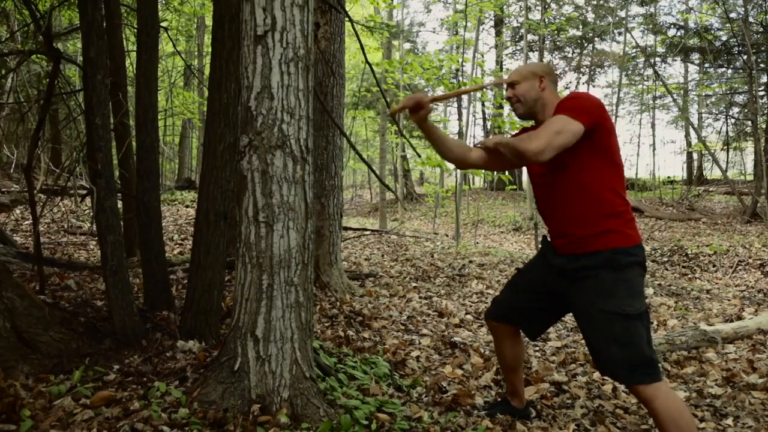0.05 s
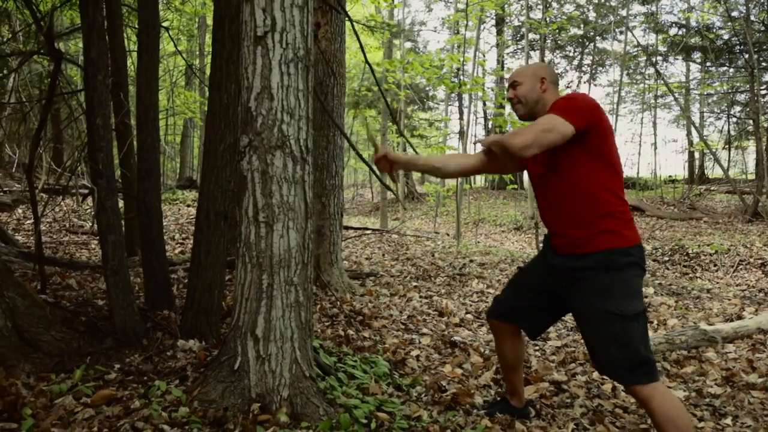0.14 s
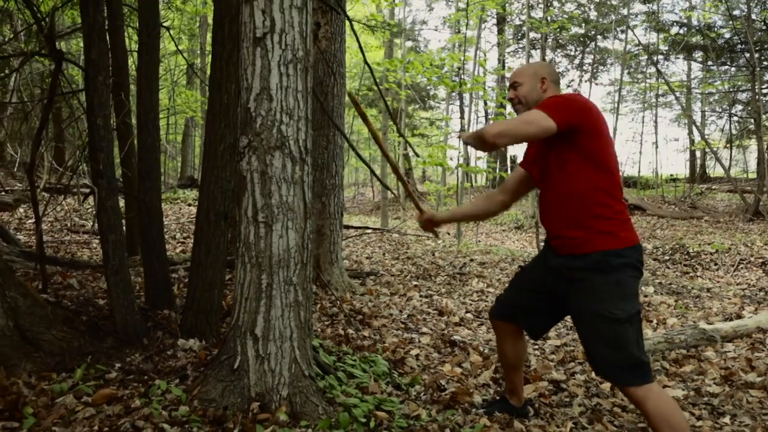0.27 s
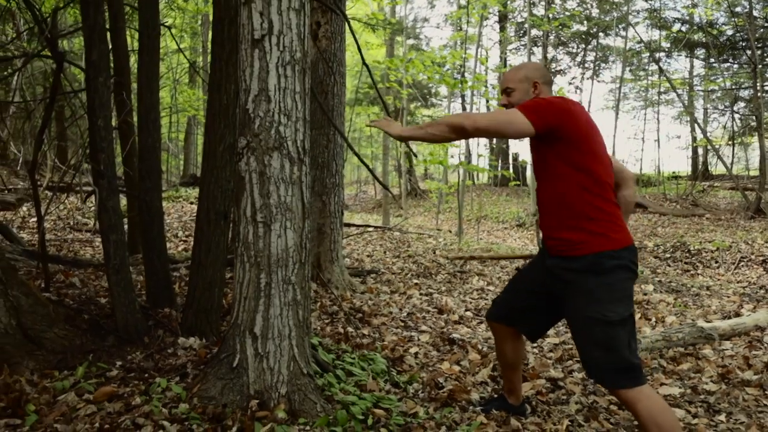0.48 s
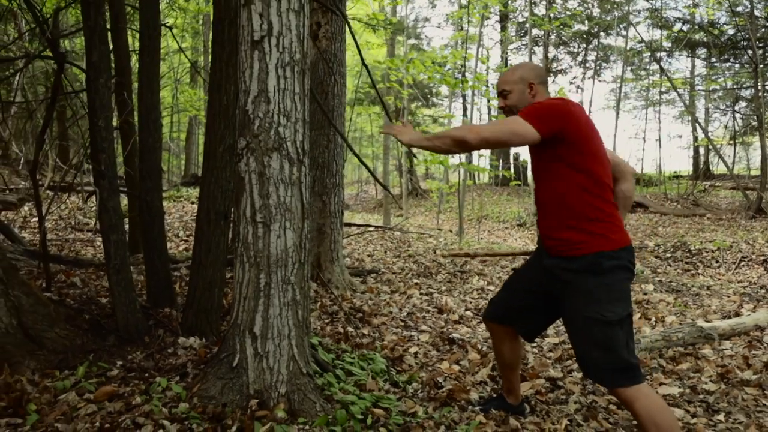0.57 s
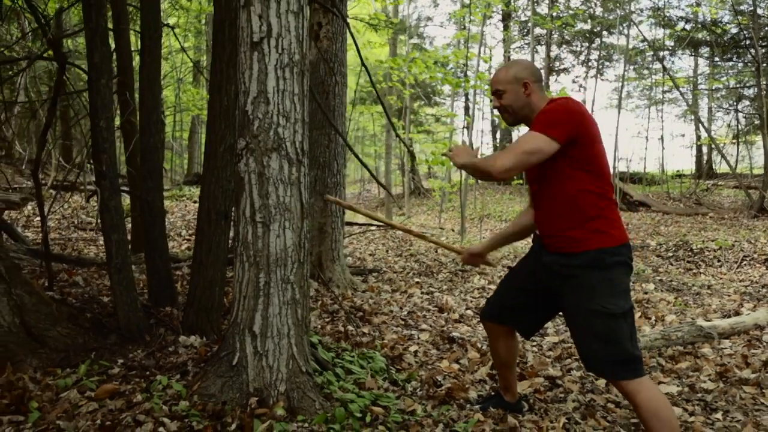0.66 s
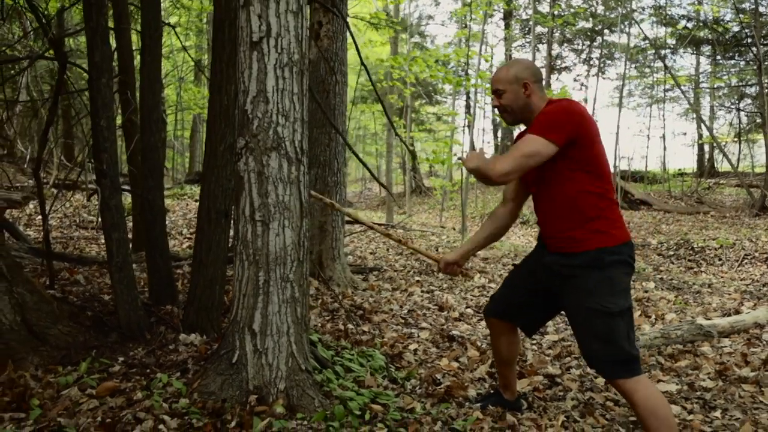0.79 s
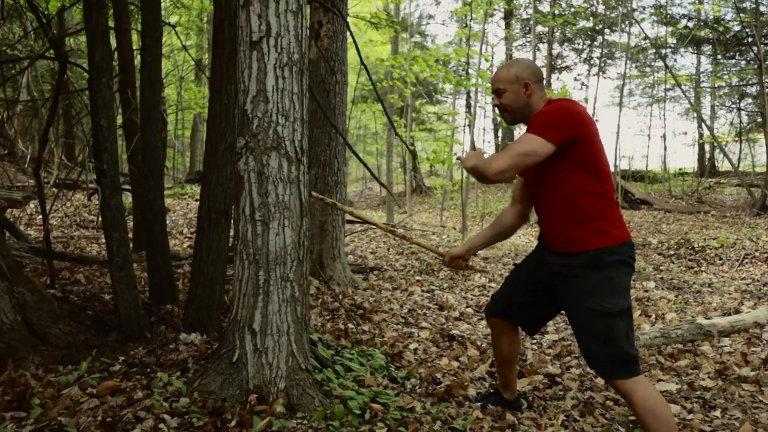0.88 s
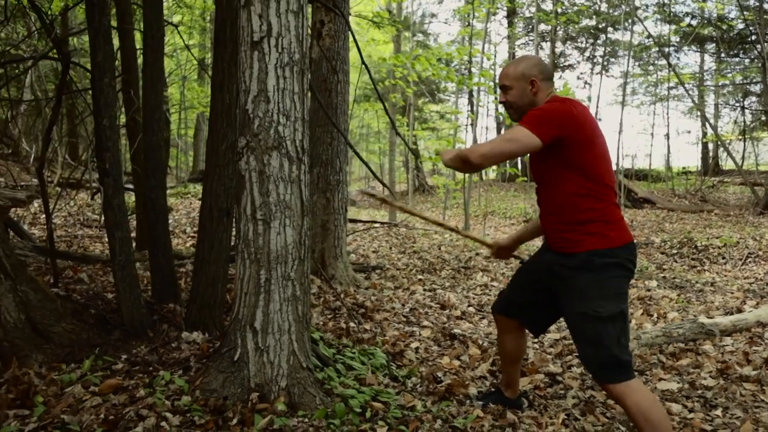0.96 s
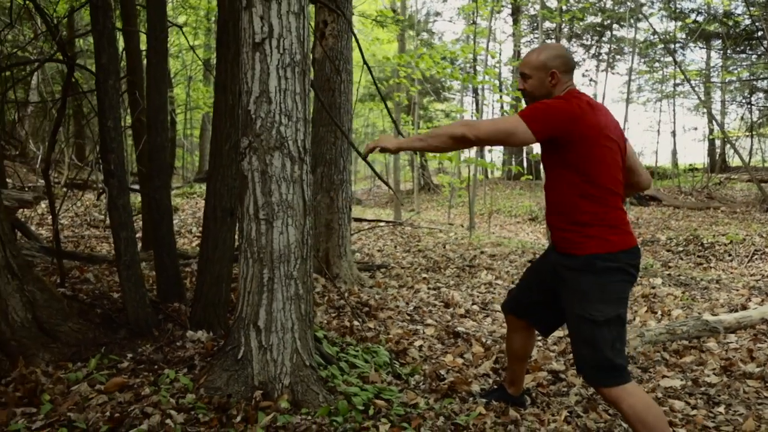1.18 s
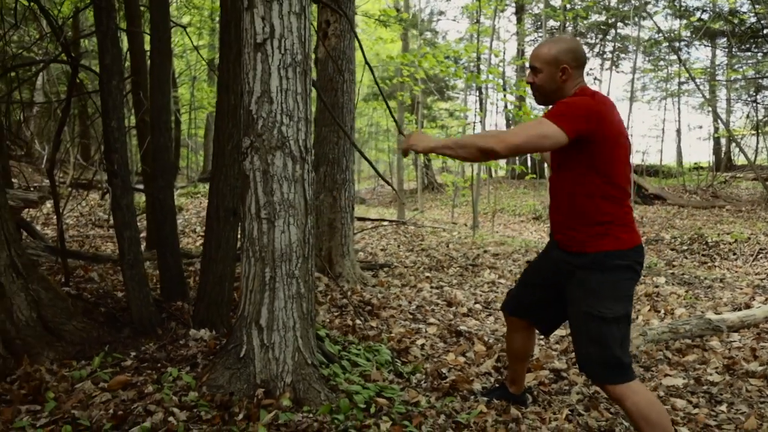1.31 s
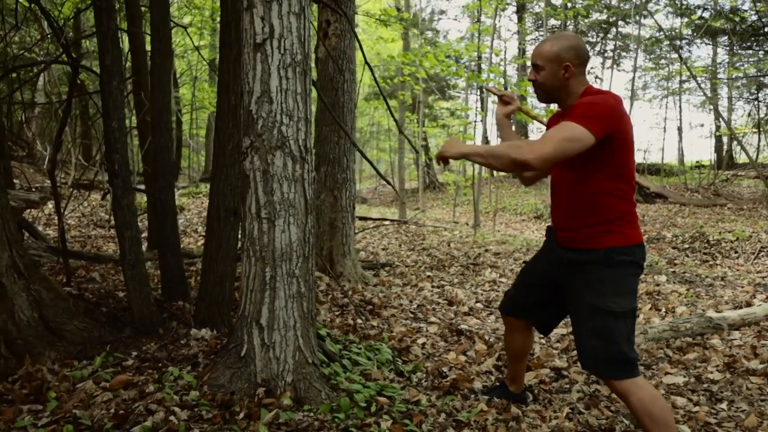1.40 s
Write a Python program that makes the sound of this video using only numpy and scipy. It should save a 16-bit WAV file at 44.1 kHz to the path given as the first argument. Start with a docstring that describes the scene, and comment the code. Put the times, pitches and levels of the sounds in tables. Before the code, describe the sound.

A wooden stick strikes a tree trunk with one hard, sharp crack at about 0.2 seconds, followed by a short forest echo. Two lighter knocks come in quick succession between 0.8 and 0.9 seconds. A foot lands with a deep, soft thump near 1.2 seconds, and a faint tap follows at 1.4. Dry leaves stir faintly underfoot, over a low wind rumble and a distant hush.

```python
"""In a quiet forest, a wooden stick strikes a tree trunk: one hard crack, two light knocks, a faint tap.
Each impact crushes bark, excites the damped modes of the stick and gives a dull thud; ground and trees
scatter the sound back as a diffuse tail. Dry leaves stir underfoot and a foot lands with a deep thump,
while light wind rumbles under a distant hush."""
import sys
import numpy as np
from scipy import signal
from scipy.fft import rfft, irfft
from scipy.io import wavfile

SR = 44100
rng = np.random.default_rng(int(sys.argv[2]) if len(sys.argv) > 2 else 0)


def pcm_store(signal):
    """Save signal as 16-bit PCM."""
    levels = np.round(np.clip(np.atleast_2d(signal), -1, 1) * 32767)
    wavfile.write(sys.argv[1], SR, levels.astype(np.int16).T)


N = 63945
T = np.arange(N) / SR

# Spectra of the distant hush and the wind. Each row: frequency in Hz, relative density in dB.
HUSH_SPECTRUM = [(100, -8.5), (300, -5), (600, -1), (950, 2), (1500, -6.5), (2200, -14), (3500, -22.5),
                 (6000, -28.5), (13000, -31.5), (16000, -44)]
WIND_SPECTRUM = [(15, -10.5), (35, 0), (75, -1.5), (115, -0.5), (160, -13.5), (260, -20.5), (600, -44.5),
                 (2000, -80)]
# Slow course of their levels. Each row: time in seconds, level in dB.
HUSH_LEVELS = [(0, -68.5), (0.4, -67.5), (0.65, -67.5), (0.92, -65.5), (1.15, -67), (1.45, -67.5)]
WIND_LEVELS = [(0, -65), (0.08, -60.5), (0.15, -65), (0.3, -61.5), (0.52, -57), (0.6, -65.5), (0.78, -62),
               (0.92, -59.5), (1.05, -59.5), (1.3, -65.5), (1.45, -58.5)]
# Leaves stirred by shifts of weight. Each row: centre in seconds, half width in seconds, level in dB.
LEAF_SWELLS = [(0.0, 0.03, -75), (0.076, 0.05, -75), (0.20, .04, -79), (0.529, 0.058, -73.5),
               (0.844, 0.021, -72.5), (1.10, 0.055, -79.5), (1.38, 0.077, -84.5)]
# Snapping leaves and twigs. Each row: start in seconds, level in dB.
TWIG_SNAPS = [(0.527, -66.5), (0.793, -71.5), (1.315, -73), (1.371, -70)]
# Spectra of dry leaves, crushed bark and the woody body under a thud.
# Each row: frequency in Hz, relative density in dB.
LEAF_SPECTRUM = [(500, -7), (2000, -1), (4500, 0.5), (7500, -4), (12500, -2.5), (16000, -9)]
BARK_SPECTRUM = [(200, -8), (900, -3.5), (1800, -1), (2800, -3.5), (4500, 2.5), (7000, -2.5), (11000, -3),
                 (13500, -4.5), (16000, -13.5)]
BODY_SPECTRUM = [(100, -6), (300, 2), (700, -4.5), (1000, -7), (1300, -1.5), (1700, -20), (6000, -60)]
# Contacts of stick and trunk; in the first three the hard blow bites, lands fully and slaps again.
# Each row: start in seconds, ring level in dB, ring roll-off in Hz, crunch level in dB,
# crunch cutoff in Hz, rise of crunch and body in seconds, crunch t60 in seconds, thud level in dB,
# thud frequency in Hz, thud t60 in seconds, body level in dB, echo gain in dB.
STICK_CONTACTS = [(0.2209, -43.5, 9000, -33, 13000, .0012, 0.0081, -34.5, 1140, 0.0066, -44, 1.5),
                  (0.2226, -38.5, 9000, -30.5, 13700, 0.00032, 0.023, -21, 170, 0.011, -36.5, 0.5),
                  (0.2268, -37, 2700, -39, 14500, 0.00051, 0.043, -38, 698, .016, -44, 1.5),
                  (0.8233, -61.5, 7000, -39, 15800, .0008, 0.01, -34.5, 279, 0.02, -41.5, -3),
                  (0.8750, -62, 1400, -51, 15800, 0.00028, 0.037, -38, 620, .013, -42.5, -13),
                  (1.4198, -66, 2600, -53.5, 6000, 0.0006, .008, -48.5, 1400, .004, -61.5, -6)]
# Modes of the hand-held stick. Each row: frequency in Hz, relative level in dB, t60 in seconds.
STICK_MODES = [(384, -12, 0.063), (644, -14.5, 0.066), (754, -12, 0.047), (1150, -3.5, 0.017),
               (1360, -5.5, .038), (1533, -0.5, 0.032), (1767, -2, 0.039), (2070, 1.5, 0.031),
               (2272, 4, 0.031), (2447, -4.5, 0.019), (3205, -4.5, 0.034), (3896, 5, .018),
               (4630, -7.5, 0.039), (4910, 4.5, 0.019), (6480, -4, 0.028)]
# Scattering by the ground and near trunks, then by far trees.
# Each row: gain in dB, rise in seconds, t60 in seconds.
ECHO_TAILS = [(-19.5, 0.0084, 0.17), (-23.5, .025, 0.77)]
# Spectrum of the scattered sound. Each row: frequency in Hz, relative density in dB.
ECHO_SPECTRUM = [(60, -5), (200, 3.5), (450, 9), (900, -2.5), (1800, 2.5), (3000, 0.5), (5000, -1),
                 (7500, -5), (11000, -3), (16000, -10)]
# Deep thumps of blows and feet.
# Each row: start in seconds, level in dB, frequency in Hz, rise in seconds, t60 in seconds.
DEEP_THUMPS = [(0.2211, -35.5, 38, 0.0018, 0.096), (0.2290, -37, 68.1, .004, 0.19),
               (0.396, -47.5, 56.6, 0.012, 0.15), (0.823, -48, 44.3, 0.0038, 0.14),
               (0.876, -45.5, 39, 0.0042, 0.079), (1.157, -37.5, 79.8, 0.007, .05),
               (1.163, -39.5, 43, 0.0035, 0.11)]


def from_db(db):
    """Amplitude grows tenfold with every 20 dB."""
    return 10 ** (np.asarray(db) / 20)


def noise(spectrum):
    """Spectral weighting turns white noise into coloured noise, scaled to unit rms."""
    hz, db = np.transpose(spectrum)
    bin_hz = np.maximum(np.arange(N // 2 + 1) * SR / N, 1)
    gain = from_db(np.interp(np.log(bin_hz), np.log(hz), db))
    coloured = irfft(rfft(rng.standard_normal(N)) * gain, N)
    return coloured / coloured.std()


def flicker(per_second):
    """Interpolation between random values, limited to +-2, gives a continuous fluctuation."""
    points = np.clip(rng.standard_normal(N), -2, 2)
    return np.interp(T * per_second, np.arange(N), points)


def burst(start, rise, t60):
    """Exponential decay, 60 dB in t60 seconds, follows a linear rise."""
    age = np.maximum(T - start, 0)
    rise = max(rise, 1 / SR)
    decay_db = -60 * np.minimum(np.maximum(age - rise, 0) / t60, 5)
    return np.minimum(age / rise, 1) * from_db(decay_db)


def ring(start, hz, t60, rise=0):
    """A damped oscillator vibrates freely as a decaying sine."""
    return burst(start, rise, t60) * np.sin(2 * np.pi * hz * (T - start))


def hush_and_wind(gust_db=1.5, gusts_per_s=12):
    """Amplitude modulation of two noises: the far hush drifts slowly, the wind swells in gusts."""
    hush_db = np.interp(T, *np.transpose(HUSH_LEVELS))
    wind_db = np.interp(T, *np.transpose(WIND_LEVELS)) + gust_db * flicker(gusts_per_s)
    return from_db(hush_db) * noise(HUSH_SPECTRUM) + from_db(wind_db) * noise(WIND_SPECTRUM)


def leaves(grain_db=2, grains_per_s=170):
    """Leaf litter under shifting weight radiates granular noise, in swells and small snaps."""
    swells = sum(from_db(db) * np.exp(-((T - centre) / width) ** 2) for centre, width, db in LEAF_SWELLS)
    snaps = sum(from_db(db) * burst(start, rise=0.00061, t60=0.023) for start, db in TWIG_SNAPS)
    return (swells + snaps) * noise(LEAF_SPECTRUM) * from_db(grain_db * flicker(grains_per_s))


def knock(contact, grain_db=3, grains_per_s=1500, mode_spread_db=1.4):
    """Impact excitation: a contact crushes bark, rings the stick's modes and gives a woody thud."""
    (start, ring_db, rolloff_hz, crunch_db, crunch_hz, rise, crunch_t60,
     thud_db, thud_hz, thud_t60, body_db) = contact
    bark = noise(BARK_SPECTRUM) * from_db(grain_db * flicker(grains_per_s))
    lowpass = signal.butter(2, crunch_hz, fs=SR, output="sos")
    crunch = signal.sosfilt(lowpass, from_db(crunch_db) * burst(start, rise, crunch_t60) * bark)
    modes = np.zeros(N)
    for k, (hz, db, t60) in enumerate(STICK_MODES):
        rolloff = 1 / np.sqrt(1 + (hz / rolloff_hz) ** 4)  # a soft contact barely excites high modes
        gain = from_db(ring_db + db + mode_spread_db * rng.standard_normal())
        modes += (-1) ** k * rolloff * gain * ring(start, hz, t60)
    body = from_db(body_db) * noise(BODY_SPECTRUM) * burst(start, rise, t60=0.018)
    thud = from_db(thud_db) * ring(start, thud_hz, thud_t60)
    return crunch + modes + body + thud


def forest_echo(sound):
    """Diffuse scattering: countless echoes add in energy to a hiss with a short and a faint long tail."""
    energy_response = np.zeros(N)
    for db, rise, t60 in ECHO_TAILS:
        tail = burst(0, rise, t60) ** 2
        energy_response += from_db(db) ** 2 * tail / tail.sum()
    energy = signal.fftconvolve(sound ** 2, energy_response)[:N]
    return np.sqrt(np.maximum(energy, 0)) * noise(ECHO_SPECTRUM)


def thumps():
    """Heavy damping lets trunk and soft ground answer blows and feet with only a few deep cycles."""
    return sum(from_db(db) * ring(start, hz, t60, rise) for start, db, hz, rise, t60 in DEEP_THUMPS)


def scene():
    """By superposition, knocks, echoes, thumps, leaves and air add in one channel."""
    knocks, echo_input = np.zeros(N), np.zeros(N)
    for *contact, echo_db in STICK_CONTACTS:
        sound = knock(contact)
        knocks += sound
        echo_input += from_db(echo_db) * sound
    return (knocks + forest_echo(echo_input) + thumps() + leaves() + hush_and_wind())[None]


def record(dry):
    """Band limiting: an elliptic low-pass filter cuts the highest treble steeply."""
    cutoff_hz = 15900
    return signal.sosfilt(signal.ellip(10, .1, 80, cutoff_hz, fs=SR, output="sos"), dry)


dry = scene()
out = record(dry)
pcm_store(out)
```